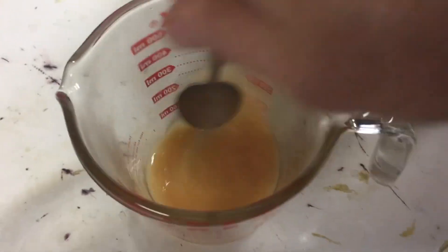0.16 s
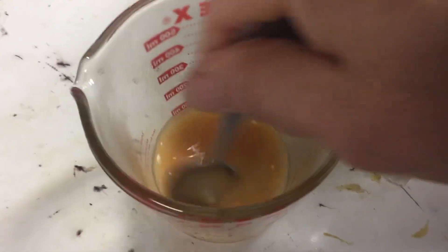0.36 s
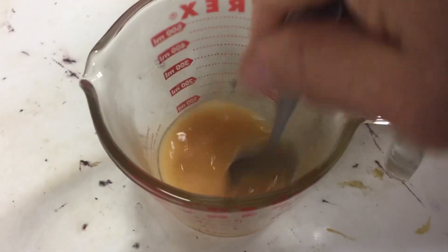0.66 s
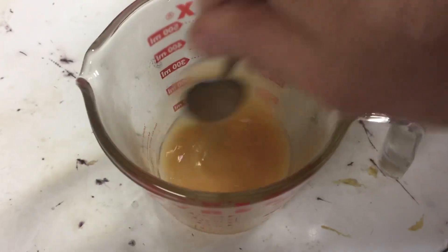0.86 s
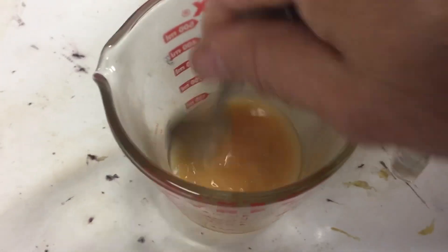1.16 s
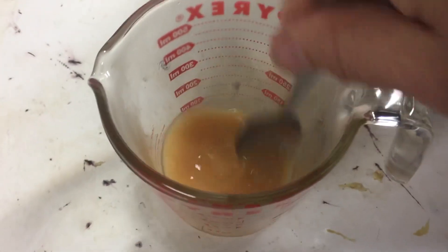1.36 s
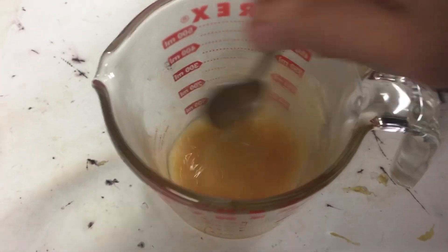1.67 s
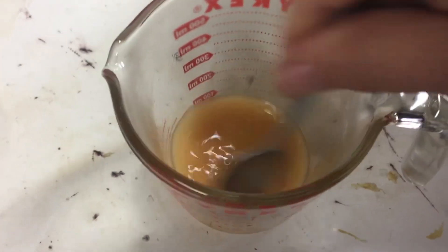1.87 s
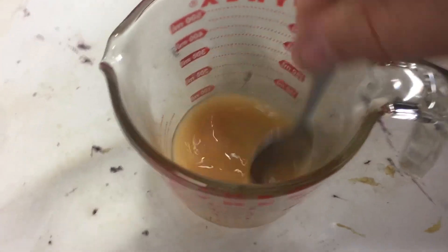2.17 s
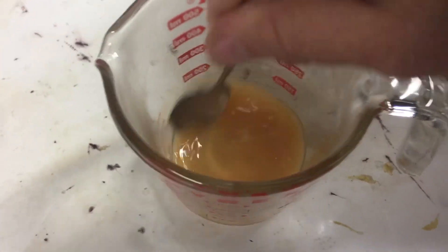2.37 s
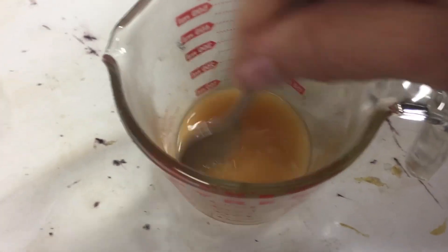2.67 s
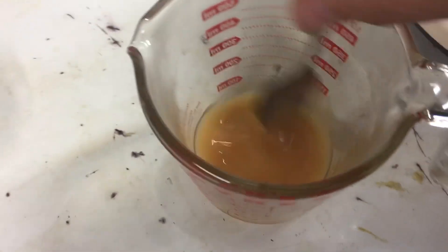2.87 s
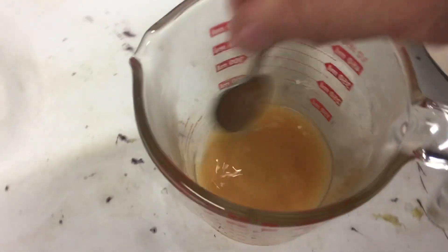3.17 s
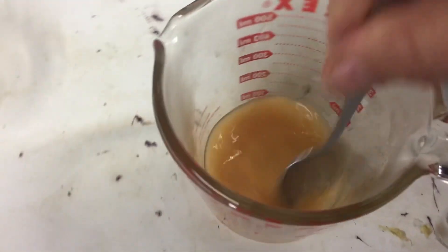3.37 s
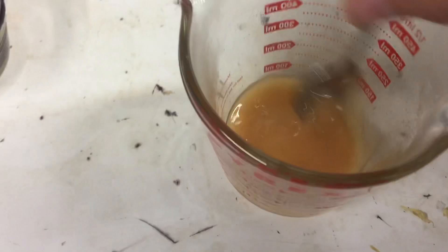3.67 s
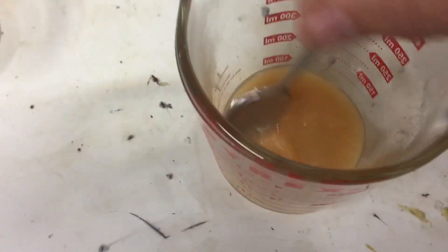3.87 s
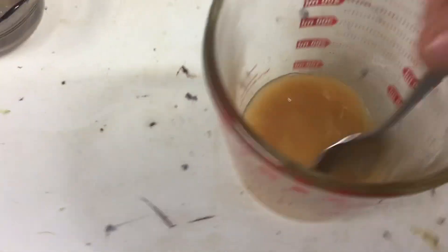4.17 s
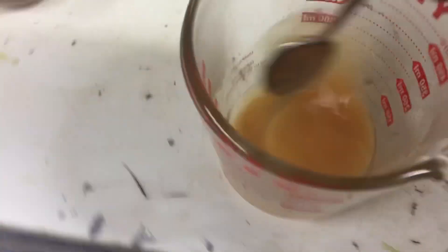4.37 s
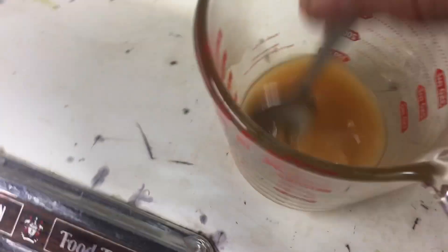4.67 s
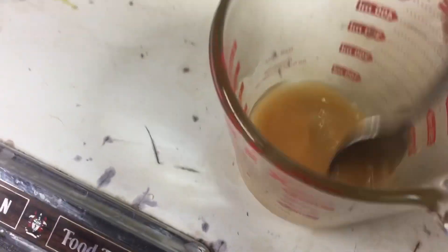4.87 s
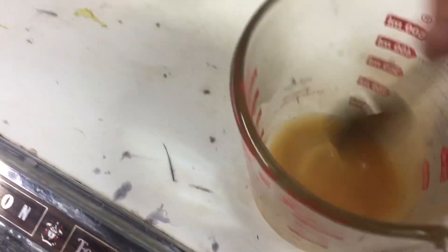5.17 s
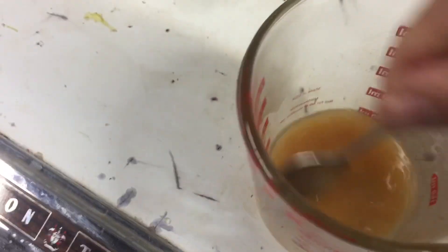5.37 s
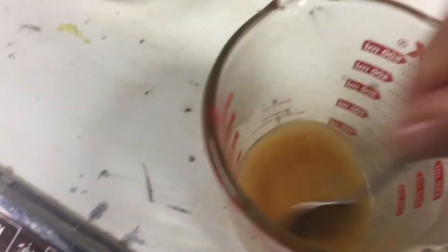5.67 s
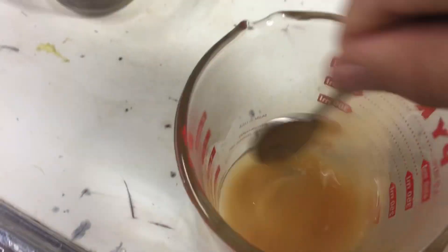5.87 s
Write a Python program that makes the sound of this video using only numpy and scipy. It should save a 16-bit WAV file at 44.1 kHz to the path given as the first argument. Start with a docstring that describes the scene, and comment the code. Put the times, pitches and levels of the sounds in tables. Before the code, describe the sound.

A metal spoon quickly stirs a little liquid in a glass measuring cup, with rapid, bright clinks over soft sloshing and scraping.

```python
"""In a quiet room, a metal spoon quickly stirs a little liquid in a thick glass measuring cup on a counter.
Each blow makes the spoon ring briefly, damped by the hand, and the glass ring for longer. Between blows
the spoon scrapes over powder, the liquid sloshes and bubbles, there are faint ticks, and the cup creeps.
The microphone is so close that the hardest clinks overload it, leaving a dull thump."""
import sys
import numpy as np
from scipy import signal
from scipy.fft import rfft, irfft, next_fast_len
from scipy.io import wavfile

SR = 44100
rng = np.random.default_rng(int(sys.argv[2]) if len(sys.argv) > 2 else 0)


def int16_out(signal):
    """Quantize to a 16-bit WAV file."""
    q = np.round(np.clip(np.atleast_2d(signal).T, -1, 1) * 32767)
    wavfile.write(sys.argv[1], SR, q.astype(np.int16))


N = 265031
TIME = np.arange(N) / SR
AGE = np.arange(int(.3 * SR)) / SR   # seconds since a short sound began
USUAL_LEVEL_DB, USUAL_TREBLE_DB = -13.5, -12   # an ordinary blow

# Blows of the spoon on the glass. A fade time ("t60") is how long a sound takes to drop by 60 dB.
# (time [s], level [dB], treble relative to level [dB], spoon's fade time [s], low note's share [0-1],
#  spoon's low note [Hz], its middle note [Hz], knock through the cup's base [dB],
#  glass's low ring [dB], glass's high ring [dB])
CLINKS = [(0.0343, -12.5, -16.5, 0.029, 0.09, 1604, 2806, -52, -37, -27),
          (0.0947, -14, -8, 0.044, 0.73, 2200.0, 2970, -41.5, -35, -44.0),
          (0.416, -14.5, -15.5, 0.034, 0.13, 1450, 2780, -43, -39, -23.5),
          (0.4759, -17, -8, 0.04, 0.5, 2175, 3110, -45.0, -39, -41),
          (0.606, -30, -33, 0.043, 1, 1990.0, 2800, -54, -39, -37),
          (0.6407, -23.5, -13.5, 0.036, 0.25, 1740, 2590, -41.5, -39, -55),
          (0.796, -22.5, -19.5, 0.046, 0.12, 1560, 2996, -83, -47, -37),
          (0.8461, -14, -7, 0.048, 0.33, 1925, 2950, -41, -38, -44.0),
          (0.9551, -19, -16.5, 0.048, 0.5, 1684, 2716, -36.5, -21.5, -64),
          (0.9851, -22, -17.5, 0.041, 0.27, 1700.0, 2670, -45.0, -36, -42),
          (1.1337, -13.5, -11.0, 0.065, 0.31, 1675, 2644, -34.5, -26.0, -22),
          (1.2184, -14, -7, 0.04, 0.3, 2184, 2990.0, -59, -34, -64),
          (1.3099, -19.5, -14, 0.037, 0.38, 1930.0, 2760, -40.0, -34.5, -32),
          (1.3702, -24.6, -22, 0.035, 0, 2090, 2510, -42.5, -71, -35),
          (1.5326, -12.5, -12, 0.046, 0.17, 1630, 2700, -37, -38, -20.5),
          (1.6145, -13.5, -6.5, 0.056, 0.83, 2127, 2980, -36.5, -26.5, -49),
          (1.7599, -20.5, -18.5, 0.031, 0.07, 2000.0, 2880, -43.5, -44, -27.5),
          (1.918, -13, -21.5, 0.035, 0.08, 1555, 3034, -64, -44.5, -30.5),
          (2.0131, -8, -8.5, 0.052, 0.14, 2115, 2488, -45.0, -28, -34.5),
          (2.034, -21.5, -17, 0.066, 0.7, 1740, 2474, -41.0, -51.5, -32.5),
          (2.14, -19.5, -14.5, 0.056, 0.43, 1896, 2585, -47.5, -36, -43.5),
          (2.2939, -11.5, -13.0, 0.051, 0.25, 2177, 2873, -42, -42, -18.5),
          (2.3525, -13, -4, 0.056, 0.44, 2203, 3026, -39.5, -41.5, -33),
          (2.5277, -14, -9, 0.035, 0.56, 2210, 2480, -41.5, -36, -48.5),
          (2.6531, -11.5, -15.5, 0.032, 0.18, 1970, 3048, -51, -38.5, -39),
          (2.7304, -11, -5.5, 0.047, 0.48, 2130, 2800, -45, -36.5, -29),
          (2.9309, -32, -19.5, 0.05, 0.18, 1390, 2600, -73, -48, -43),
          (3.1444, -7, -8, 0.064, 0.21, 2233, 2562, -48, -21.0, -21),
          (3.2471, -40, -6.5, 0.042, 0.9, 1710.0, 2380, -73, -51, -81),
          (3.289, -56, 2, 0.028, 0.85, 1690, 2470.0, -77.0, -54, -74),
          (3.4158, -15.5, -16, 0.037, 0, 1690, 2840, -44.5, -48, -55),
          (3.5184, -12.5, -4.5, 0.06, 0.18, 1502, 2570, -47, -28, -21),
          (3.674, -19.5, -11.5, 0.042, 0.55, 1842, 2710, -33, -39.0, -41),
          (3.782, -35.5, -20, 0.094, 0.17, 2050, 2740, -52, -60, -47.0),
          (3.9551, -5.5, -10.0, 0.06, 0.45, 2170, 2564, -51, -23, -10),
          (4.0724, -22, -13.5, 0.031, 0.46, 2020.0, 2920, -38.0, -38, -61),
          (4.2136, -33, -14, 0.069, 0.05, 1650, 2810, -56, -37.5, -39),
          (4.2479, -26, -11.5, 0.062, 0.56, 1755, 3100, -56, -56.0, -24),
          (4.2553, -19.5, -20.5, 0.055, 0.01, 1780, 2980, -56, -45, -47.0),
          (4.3274, -14, -2.5, 0.047, 0.33, 1847, 2425, -39.5, -39, -15.5),
          (4.453, -26, -30, 0.049, 0.6, 1870.0, 2520, -55, -43.0, -33),
          (4.488, -18.5, -14, 0.039, 0.06, 2090, 3154, -38.5, -51, -22.5),
          (4.6344, -20, -12.5, 0.069, 0.27, 2010, 2906, -48, -41, -29),
          (4.6853, -11.5, -7, 0.056, 0.42, 2093, 2863, -41, -53, -25),
          (4.835, -11.5, -7.5, 0.038, 0.12, 1953, 2580, -47, -49, -11),
          (4.851, -16, -5.5, 0.029, 0.3, 1950, 3180, -29, -31, -20),
          (4.9824, -15, -7, 0.045, 0.36, 1890.0, 2810, -55, -33, -44.0),
          (5.0624, -24, -17, 0.04, 0.8, 2245, 3280, -47.5, -44, -29),
          (5.068, -19.5, -12.5, 0.045, 0.14, 2060.0, 3290, -54.0, -49, -44),
          (5.0944, -22.5, -10, 0.054, 0.6, 1512, 2670, -54, -42, -33),
          (5.1987, -31, -23, 0.053, 0.67, 1880, 2500, -40.0, -54, -44),
          (5.3557, -13.5, -8.5, 0.053, 0.28, 2140, 3162, -37, -35, -19.5),
          (5.4234, -14.5, -10.5, 0.066, 0.44, 2040, 2740, -44, -43, -29.0),
          (5.5746, -23, -7.5, 0.044, 0.51, 1894, 3230, -32.5, -42, -56),
          (5.7385, -11.5, -4.5, 0.042, 0.26, 2290, 2573, -36, -35, -22.5),
          (5.7998, -17.6, -11.5, 0.044, 0.34, 1620, 2930, -60, -36, -23.5),
          (5.9204, -20.5, -8, 0.016, 0.11, 1990, 2970, -33.0, -41, -46.0)]


def from_db(db):
    """Turn decibels into a gain."""
    return 10 ** (np.asarray(db) / 20)


def rms_one(x):
    """Scale a sound to an average strength (rms) of 1."""
    return x / np.sqrt(np.mean(x ** 2) + 1e-20)


def attack_one(x):
    """Scale a blow to an average strength of 1 over its first 25 ms."""
    return x / np.sqrt(np.mean(x[:int(.025 * SR)] ** 2) + 1e-20)


def dying(t60):
    """A fade that drops by 60 dB in t60 seconds."""
    return np.exp(-np.log(1000) * AGE / max(t60, 1e-3))


def swell(length):
    """A smooth rise to 1 and back: half a sine wave."""
    return np.sin(np.pi * AGE[AGE < length] / length)


def flutter(per_s):
    """A random wobble of average size 1."""
    knots = np.arange(0, TIME[-1] + 1, 1 / per_s)
    return rms_one(np.interp(TIME, knots, rng.standard_normal(len(knots))))


def add(out, s, sound):
    """Mix a sound in at s seconds."""
    at = max(round(s * SR), 0)
    out[at:at + len(sound)] += sound[:N - at]


def band(x, low_hz, high_hz, order=2):
    """Keep the part of a sound between two frequencies."""
    sections = signal.butter(order, [low_hz, min(high_hz, .45 * SR)], "band", fs=SR, output="sos")
    return signal.sosfilt(sections, x)


def coloured(x, spectrum):
    """Shape a sound's lows and highs by a table, falling away past its ends; average strength 1."""
    size = next_fast_len(len(x))
    hz = np.maximum(np.arange(size // 2 + 1) * SR / size, 1)
    points, db = np.transpose(spectrum)
    ends = 1 / np.sqrt((1 + (points[0] / hz) ** 8) * (1 + (hz / points[-1]) ** 8))
    gain = from_db(np.interp(np.log(hz), np.log(points), db))
    return rms_one(irfft(rfft(x, size) * ends * gain, size)[:len(x)])


def ring(clicks, hz, t60):
    """Each click starts a fading tone as strong as the click."""
    decay, step = from_db(-60 / (t60 * SR)), 2 * np.pi * hz / SR
    return signal.lfilter([0, np.sin(step)], [1, -2 * decay * np.cos(step), decay ** 2], clicks + 1e-18)


def room_tone(start_db=-54, end_db=-57):
    """The room's faint low rumble eases a little over time."""
    # Tone colour of the rumble: (frequency [Hz], relative level [dB])
    rumble_colour = [(22, -2), (45, -25), (75, 2), (130, -1.5), (200, -0.5), (320, -7.5), (550, -26),
                     (1200, -9.5), (4000, -26), (15000, -54)]
    return from_db(np.linspace(start_db, end_db, N)) * coloured(rng.standard_normal(N), rumble_colour)


def ringing_grains(low_hz, high_hz, per_s, cycles, spread_db, count=36):
    """Random clicks of very uneven size, each ringing for some cycles at one of many pitches."""
    sizes = from_db(spread_db * np.minimum(rng.exponential(1, N), 4)) * rng.choice([-1, 1], N)
    clicks = sizes * (rng.random(N) < per_s / SR)
    pitches = np.geomspace(low_hz, high_hz, count)
    chosen = rng.integers(0, count, N)
    return sum(ring(clicks * (chosen == k), hz, cycles / hz) for k, hz in enumerate(pitches))


def stroke_levels(swirl_db=-59, grit_db=-63, rush_db=-41, rush_s=0.018, wash_db=-20.5, wash_rise_s=0.027):
    """Gains of slosh and scrape: both swell as the spoon drags, and the slosh also around blows."""
    # Once or twice a turn the spoon drags over the bottom:
    # (middle time [s], length [s], scrape level [dB], slosh level [dB])
    drags = [(0.234, 0.18, -77, -50), (0.397, 0.19, -48.5, -47), (0.45, 0.059, -60, -30),
             (0.745, 0.078, -52, -51), (1.11, 0.17, -51, -50), (1.513, 0.13, -46.5, -59),
             (1.697, 0.07, -46, -36.5), (1.869, 0.14, -47.5, -45.5), (1.991, 0.027, -41.5, -40),
             (2.227, 0.11, -53.5, -57), (2.604, 0.096, -48.5, -48), (2.973, 0.14, -50.5, -52),
             (3.126, 0.041, -51.5, -58), (3.378, 0.09, -50, -63), (3.557, 0.14, -46, -38),
             (3.73, 0.12, -49, -44), (3.943, 0.15, -51.5, -46), (4.188, 0.12, -46, -55),
             (4.397, 0.05, -55, -46), (4.555, 0.33, -50, -45), (4.803, 0.064, -44.5, -36.5),
             (5.008, 0.11, -43, -43), (5.277, 0.082, -45, -69), (5.353, 0.076, -45, -36),
             (5.517, 0.1, -59, -50), (5.725, 0.22, -41, -46), (5.836, 0.08, -45.5, -55),
             (6, 0.057, -46.5, -43.5)]
    slosh_power = np.full(N, from_db(swirl_db) ** 2)
    scrape_power = np.full(N, from_db(grit_db) ** 2)
    for s, length, scrape_db, slosh_db in drags:
        add(scrape_power, s - length / 2, (from_db(scrape_db) * swell(length)) ** 2)
        add(slosh_power, s - length / 2, (from_db(slosh_db) * swell(length)) ** 2)
    for s, db, *_ in CLINKS:
        if db >= USUAL_LEVEL_DB:   # the spoon shoves liquid against the wall just before a strong blow
            add(slosh_power, s - rush_s, (from_db(rush_db) * swell(2 * rush_s)) ** 2)
        lapping = from_db(db + wash_db) * (1 - np.exp(-AGE / wash_rise_s)) * dying(t60=0.26)
        add(slosh_power, s, lapping ** 2)
    return np.sqrt(slosh_power), np.sqrt(scrape_power)


def stirring(slosh_db=-2.5, scrape_db=-0.5):
    """Tiny bubbles ring in the swirl, while grains of powder under the spoon make the glass whisper."""
    # Tone colour of the liquid: (frequency [Hz], relative level [dB])
    slosh_colour = [(450, -23), (800, -17.5), (1050, -21), (1550, 8.5), (2050, 5), (2500, 5.5), (2900, 15),
                    (3500, -3.5)]
    # Tone colour of the scraped powder: (frequency [Hz], relative level [dB])
    grit_colour = [(2800, 1), (3400, -11), (4100, 1.5), (4900, -23), (6200, -12), (6800, -9.5),
                   (7900, -3.5), (9000, -11.5), (10300, -16), (12700, -4.5), (15500, -33.5)]
    slosh_gain, scrape_gain = stroke_levels()
    fizz = ringing_grains(500, 3600, per_s=800, cycles=45, spread_db=3.8)
    grind = ringing_grains(2800, 15000, per_s=6000, cycles=180, spread_db=3, count=48)
    swirl = coloured(fizz, slosh_colour) * slosh_gain * from_db(slosh_db + 2 * flutter(per_s=40))
    scrape = coloured(grind, grit_colour) * scrape_gain * from_db(scrape_db + 2.5 * flutter(per_s=70))
    return swirl + scrape


def crowd(low_hz, high_hz, t60):
    """Many close, short notes, blurred into noise by echoes inside the cup."""
    return attack_one(band(rng.standard_normal(len(AGE)) * dying(t60), low_hz, high_hz, order=3))


def spoon_note(hz, t60, blur, spread, rise_s=0.00044):
    """One clear note among neighbours that die sooner; blur sets their strength, spread their range."""
    tone = attack_one(np.sin(2 * np.pi * hz * AGE) * dying(t60) * (1 - np.exp(-AGE / rise_s)))
    neighbours = crowd(hz / spread, hz * spread, .85 * t60)
    return attack_one(tone * rng.choice([-1, 1]) + blur * neighbours)


def spoon(base_hz=859, high_hz=3668, ping_hz=7368, sizzle_hz=11360, pitch_scatter=.03):
    """Hand and liquid quickly damp the struck spoon; its notes shift with grip and depth."""
    out = np.zeros(N)
    shifts = np.exp(pitch_scatter * rng.standard_normal((len(CLINKS), 3)))
    for clink, (high_shift, ping_shift, sizzle_shift) in zip(CLINKS, shifts):
        s, db, treble_db, t60, low_share, low_hz, middle_hz, base_db, *_ = clink
        low_share = np.clip(low_share, .01, .99)
        base = from_db(base_db) * spoon_note(base_hz, t60=0.024, blur=1.1, spread=1.173)
        low_note = spoon_note(low_hz, 1.72 * t60, blur=1.0, spread=1.355)
        low = from_db(db - 2.7) * np.sqrt(low_share) * low_note

        # A harder contact (more treble) blurs the middle note and feeds the upper ones.
        hardness_db = treble_db - USUAL_TREBLE_DB
        middle_blur = 0.92 * from_db(.4 * hardness_db)
        middle_note = spoon_note(middle_hz, 0.86 * t60, blur=middle_blur, spread=1.162)
        middle = from_db(db - 1.5) * np.sqrt(1 - low_share) * middle_note
        high_note = spoon_note(high_hz * high_shift, 0.91 * t60, blur=1.94, spread=1.226)
        high = from_db(db - 8.5 + 0.25 * hardness_db) * high_note

        # Harder and stronger blows reach higher notes.
        ping_shift *= 2 ** (.005 * hardness_db)
        sizzle_shift *= 2 ** (.025 * max(db - USUAL_LEVEL_DB, 0))
        # In the treble, one thin steel tone outlasts the tick around it.
        ping_tone = spoon_note(ping_hz * ping_shift, 1.2 * t60, blur=.25, spread=1.08)
        sizzle_tone = spoon_note(sizzle_hz * sizzle_shift, 1.1 * t60, blur=.35, spread=1.06)
        ping = from_db(db + treble_db - 3) * attack_one(crowd(5080, 8900, 0.67 * t60) + .8 * ping_tone)
        sizzle_db = db + treble_db - 7 + 0.3 * hardness_db
        sizzle = from_db(sizzle_db) * attack_one(crowd(8520, 15600, 0.42 * t60) + 0.43 * sizzle_tone)

        crack = from_db(sizzle_db - 6) * crowd(3000, 9200, t60=0.0045)   # bare steel meets glass
        push = from_db(db - 35) * crowd(180, 630, t60=0.047)   # the whole cup is nudged
        add(out, s, base + low + middle + high + ping + sizzle + crack + push)
    return out


def glass(ring_db=0.5):
    """Every blow rings the same notes of the glass wall, in a balance set by where the spoon lands."""
    # The wall's natural notes: (pitch [Hz], relative level [dB], fade time [s])
    wall_notes = [(800, -17, .15), (1172, -16, .22), (1295, -14, .23), (1701, 1, .28), (1884, -7, .1),
                  (2255, -3, .13), (2326, -7, .1), (2470, -12, .14), (3162, -1, .2), (3682, -6, .19),
                  (4194, -10, .18), (4988, -16, .18), (6215, -24, .17), (7257, -9, .12), (7470, -7, .1),
                  (7806, -14, .13), (8022, -11, .11), (9613, -16, .11), (10470, -16, .12),
                  (11220, -20, .12), (13790, -23, .11), (14205, -17, .11), (14578, -18, .12),
                  (14820, -22, .11)]
    s, level_db, treble_db, *_, low_ring_db, high_ring_db = np.transpose(CLINKS)
    at = np.round(s * SR).astype(int)
    wall_db = level_db - 13.5 + 0.26 * (treble_db - USUAL_TREBLE_DB)   # the lesser notes
    upper_db = level_db + treble_db - 8.5
    top_db = level_db + treble_db - 5 + 0.62 * (level_db - USUAL_LEVEL_DB)
    # How strongly each blow drives each range of pitch.
    zones_hz = [1295, 1701, 1884, 3162, 3682, 5000, 7500, 12000]
    zones_db = [wall_db, low_ring_db, wall_db, high_ring_db, wall_db, wall_db, upper_db, top_db]
    out = np.zeros(N)
    for hz, db, t60 in wall_notes:
        blow_db = np.array([np.interp(hz, zones_hz, blow) for blow in np.transpose(zones_db)])
        scatter_db = min(-db / 2, 3) * rng.standard_normal(len(at))   # weaker notes vary most
        clicks = np.zeros(N)
        clicks[at] = from_db(blow_db + db + ring_db + scatter_db)
        out += ring(clicks * rng.choice([-1, 1]), hz, t60)
    return out


def room_echo(x, t60=0.22, level_db=-22.5, delay_s=0.0063):
    """The room answers each sound with a short, smeared echo."""
    body = band(rng.standard_normal(len(AGE)), 150, 5800) * dying(t60)
    treble = band(rng.standard_normal(len(AGE)), 3500, 17000) * dying(1.05 * t60)
    tail = (body + treble) * (AGE > delay_s) / np.sqrt(np.sum(dying(t60) ** 2))
    return from_db(level_db) * signal.fftconvolve(x, tail)[:N]


def bubbles_and_ticks(noise_share=0.06):
    """Short bubble blips and faint ticks between the blows: each a gliding tone with a little noise."""
    # Blips and ticks: (time [s], starting pitch [Hz], pitch rise [octaves/s], level [dB], length [s])
    blips_and_ticks = [(0.256, 3040, 15, -49, 0.013), (1.113, 1950, 9, -26, 0.015),
                       (1.42, 3030, 40, -23.5, 0.0064), (1.517, 2550, 10, -21.5, 0.01),
                       (1.7, 2740, 11.5, -45, .006), (1.703, 2300, 11.5, -41, 0.009),
                       (3.253, 2160, 8, -35.5, 0.018), (3.488, 480, -12, -38, 0.011),
                       (4.197, 2030, 4, -33, 0.011), (4.718, 2500, -2.5, -19, 0.027),
                       (4.802, 2190, 10, -38, 0.011), (4.877, 1036, 27, -19.5, 0.019),
                       (5.187, 1880, -6, -31, 0.011), (5.557, 1890, 2, -26, 0.019),
                       (5.987, 780, 17, -33, 0.011)]
    out = np.zeros(N)
    for s, hz, rise, db, length in blips_and_ticks:
        age = AGE[AGE < length]
        phase = 2 * np.pi * np.cumsum(hz * 2 ** (rise * age)) / SR
        add(out, s, from_db(db) * np.sin(phase) * swell(length))
        add(out, s, from_db(db) * noise_share * crowd(0.43 * hz, 1.6 * hz, t60=2 * length))
    return out


def overload_thumps(sink_s=0.012, roughness=0.12):
    """The hardest clinks overload the microphone, leaving a dull thump that sinks in pitch."""
    # The thumps: (time [s], level [dB], fade time [s], starting pitch [Hz])
    thumps = [(2.014, -46, 0.036, 90), (3.144, -30, 0.12, 254), (3.958, -42.5, 0.084, 150),
              (4.836, -39, 0.027, 109), (5.737, -52, 0.026, 110)]
    # Tone colour of the noise in a thump: (frequency [Hz], relative level [dB])
    thump_colour = [(25, -6), (70, 11), (200, -22), (350, 1.5), (700, -10)]
    out = np.zeros(N)
    for s, db, t60, hz in thumps:
        boom = np.sin(2 * np.pi * np.cumsum(hz * np.exp(-AGE / sink_s)) / SR)
        noise = roughness * coloured(rng.standard_normal(len(AGE)), thump_colour)
        add(out, s, from_db(db) * attack_one((boom + noise) * dying(t60)))
    return out


def cup_slide():
    """The cup's base rubs as it creeps over the counter."""
    # Loudness of the rubbing: (time [s], level [dB])
    rub_levels = [(0, -91), (3.42, -78), (3.52, -49.5), (3.62, -47.5), (3.7, -49.5), (3.88, -62.5),
                  (4.4, -61.5), (4.52, -52.5), (4.66, -60), (4.9, -57.5), (5.1, -64), (6.01, -55.5)]
    # Tone colour of the rubbing: (frequency [Hz], relative level [dB])
    rub_colour = [(250, -11), (500, -2.5), (740, 0.5), (1000, 0.5), (1400, -65)]
    gain = from_db(np.interp(TIME, *np.transpose(rub_levels)))
    return gain * coloured(rng.standard_normal(N), rub_colour)


def scene():
    """Spoon, cup and liquid close by, over the room's low rumble."""
    close = spoon() + glass() + cup_slide() + overload_thumps() + bubbles_and_ticks() + stirring()
    return (close + room_echo(close) + room_tone())[None]


def record(dry, cutoff_hz=16500):
    """The overloaded microphone flattens the loudest peaks, and the highest treble is cut."""
    clipped = dry / (1 + np.abs(dry) ** 8) ** (1 / 8)
    return signal.sosfilt(signal.cheby2(16, 60, cutoff_hz, fs=SR, output="sos"), clipped)


dry = scene()
out = record(dry)
int16_out(out)
```